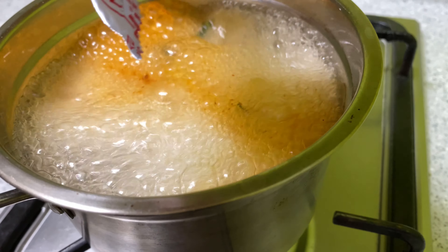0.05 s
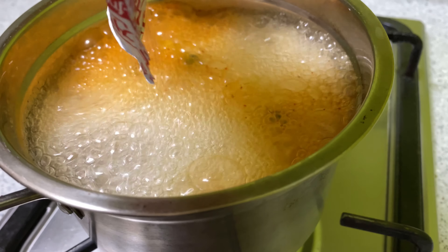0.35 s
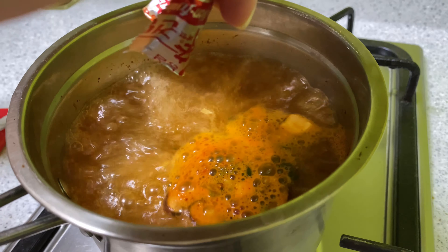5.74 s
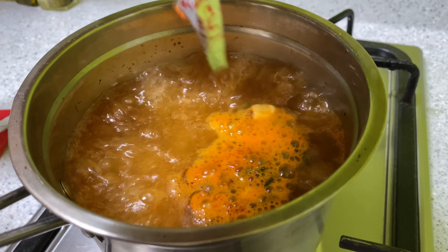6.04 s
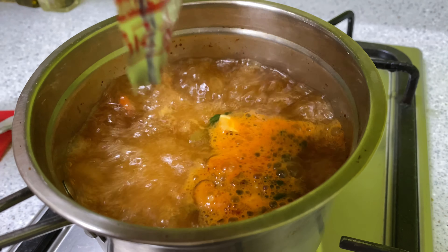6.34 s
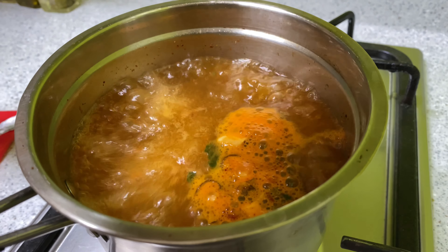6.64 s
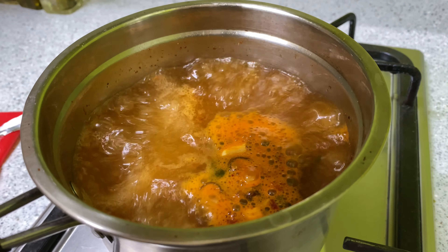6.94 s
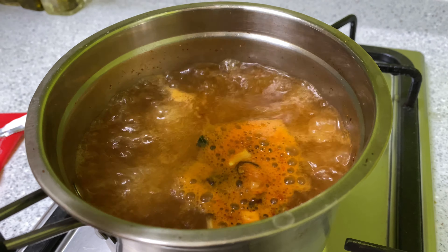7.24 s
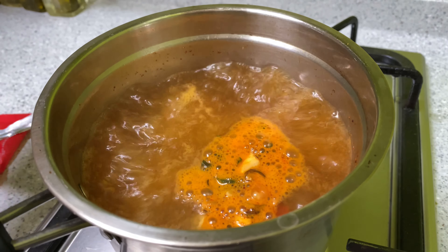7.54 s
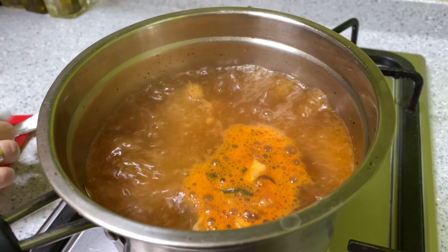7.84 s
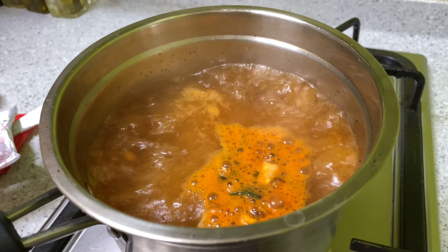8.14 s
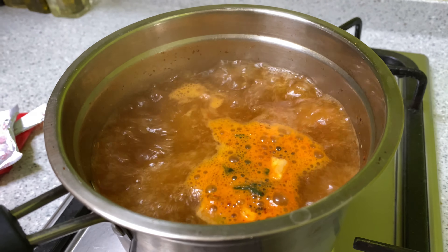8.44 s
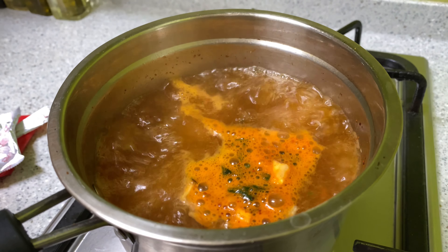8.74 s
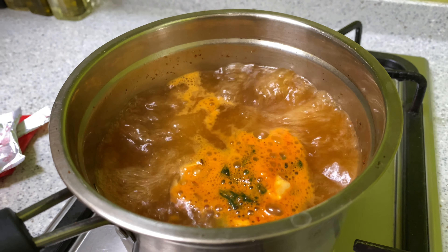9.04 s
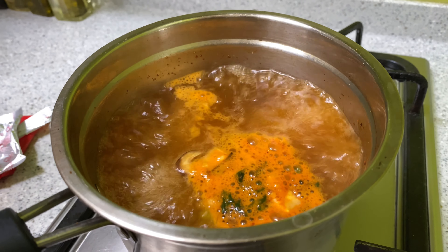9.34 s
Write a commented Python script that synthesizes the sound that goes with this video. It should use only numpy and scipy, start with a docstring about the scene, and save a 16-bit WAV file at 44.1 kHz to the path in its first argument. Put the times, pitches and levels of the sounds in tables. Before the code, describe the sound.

A steel pot of broth boils throughout in a small kitchen, a low rumble that grows a little over the first four seconds, with a light simmer and a fine hiss of foam on top. From about 0.3 seconds, fingers squeeze plastic seasoning sachets close by: an uneven, bright crinkle dotted with sharp snapping creases, the sharpest at about 1.5 seconds. Faint bumps come at 1.4 and 3.8 seconds, and the plastic gives one hollow pop at 3.7. The crinkling is busiest from 4.4 to 5.8 seconds and stops just after 6, leaving two stray ticks. The foam's hiss fades away by about 7 seconds while the rumble continues. A soft, low double bump lands at 7.5 seconds. From 8.5 seconds to the end, just past 9, the packets slide and crumple with a duller rustle, with another padded thump at 9.1.

```python
"""Seasoning sachets over a boiling pot

Plastic sachets are squeezed empty over a steel pot of broth in a small kitchen. Steam bubbles make the
pot rumble while its foam hisses and slowly sinks. Creases snap one by one over a fine crinkle, a panel
pops once, and a few soft bumps come and go. Near the end the packets are handled with a duller rustle."""
import sys
import numpy as np
from scipy import signal
from scipy.io import wavfile
from scipy.ndimage import uniform_filter1d

SR = 44100
rng = np.random.default_rng(int(sys.argv[2]) if len(sys.argv) > 2 else 0)


def dump_mix(stems):
    """Bounce the given channels to the path in sys.argv[1] as a 16-bit WAV at rate SR."""
    frames = np.atleast_2d(stems).T  # one column per channel
    limited = np.clip(frames, -1, 1)  # hard clip at full scale
    pcm = np.round(limited * 32767).astype(np.int16)
    wavfile.write(sys.argv[1], SR, pcm)


N = 413658
TIME = np.arange(N) / SR

# How strongly the broth boils: time_s, level_db
BOIL_LEVEL = [(0, -51.5), (.45, -50), (.8, -46.5), (2.2, -45.5), (3.1, -44), (3.8, -39.5), (4.1, -42),
              (5.3, -42.5), (6.15, -40), (6.6, -43), (7.05, -41.5), (8.1, -42.5), (9.38, -43.5)]
# The deep tone of the rumble: frequency_hz, gain_db
RUMBLE_TONE = [(22, -55), (33, -11), (43, -9.5), (56, 0), (62, -1), (69, 1.5), (82, -7), (100, -10),
               (150, -23.5), (200, -18.5), (300, -35), (600, -54)]
# One low note of the pot, kept going by the boil: time_s, level_db
DRONE_LEVEL = [(0, -53.5), (3.2, -48.5), (5.2, -51), (6.1, -49.5), (7.05, -46.5), (7.5, -49.5),
               (8.1, -53.5), (9.38, -49.5)]
# The foam's hiss, fading as it sinks: time_s, level_db
FOAM_LEVEL = [(0, -44), (.45, -47), (2.2, -46), (3.55, -52), (5, -51), (6.3, -54.5), (7, -65), (9.38, -94)]
# The tone of that hiss: frequency_hz, gain_db
FOAM_TONE = [(150, -20), (320, -6), (450, -3.5), (660, 0.5), (1040, 0), (1900, 1), (3830, -3), (7830, -5.5),
             (16000, -9)]
# The tone of the steady simmer: frequency_hz, gain_db
SIMMER_TONE = [(170, -17.5), (240, 0), (290, -7.5), (350, -4.5), (500, -13.5), (750, -10), (1250, -16),
               (1900, -16.5), (3100, -14.5), (3700, -21), (10500, -21), (16000, -26.5)]
# Fingers press the plastic film: start_s, length_s, level_db
FINGER_SQUEEZES = [(0.265, 0.023, -41), (0.527, 0.031, -33), (0.632, 0.052, -36.5), (0.72, 0.14, -40.5),
                   (1.085, 0.024, -36.5), (1.173, 0.13, -40.5), (1.38, 0.12, -43), (1.53, 0.22, -42),
                   (1.863, 0.11, -38), (2.145, 0.022, -39), (2.284, 0.027, -39.5), (2.374, 0.068, -34.5),
                   (2.462, 0.034, -41), (2.53, 0.079, -35.5), (2.68, .11, -35.5), (2.829, 0.025, -30),
                   (2.88, 0.057, -38), (3.04, 0.03, -40.5), (3.147, 0.19, -40), (3.376, 0.16, -40.5),
                   (3.65, .04, -44), (3.808, .08, -44.5), (4.002, 0.16, -38), (4.167, 0.071, -43.5),
                   (4.297, .11, -43.5), (4.419, 0.12, -31), (4.547, .07, -36), (4.67, 0.241, -35),
                   (5.01, 0.17, -32.5), (5.193, 0.18, -37), (5.307, 0.2, -31.5), (5.486, 0.11, -37),
                   (5.643, .13, -31.5), (5.878, 0.031, -34.5), (5.956, 0.017, -38), (6.065, 0.02, -39)]
# The tone of the crinkling film: frequency_hz, gain_db
FILM_TONE = [(200, -22.5), (480, -10), (1150, -1.5), (1950, -10.5), (2400, -2), (3000, -4), (3400, -2),
             (3950, -4), (4800, -3), (5600, -3), (7000, -3), (9600, -3), (12000, -10.5), (16000, -13.5)]
# The loudest creases that snap: start_s, pitch_hz, level_db, body_db (hollow part, relative to level_db)
CREASE_SNAPS = [(0.5338, 3900, -30, -12), (0.544, 4220, -31, -11.5), (0.588, 5600, -30.5, -14),
                (0.6027, 4800, -26, -24), (0.6752, 10100, -29.5, -17), (0.6921, 4600, -27, -7.5),
                (0.7414, 6740, -25.5, -17), (0.7715, 5800, -25, -9), (0.8418, 2630, -34, -9),
                (0.912, 5400, -27, -17), (0.9888, 9700, -26.5, -22), (1.0018, 3780, -27.5, -24),
                (1.097, 5070, -31.5, -13), (1.211, 5700, -31, -19), (1.261, 7300, -31.5, -14),
                (1.3705, 8400, -28.5, -15), (1.4096, 3940, -31, -13), (1.4494, 4300, -32.5, -15),
                (1.471, 6000, -34.5, -18.5), (1.5263, 3760, -18, -15.5), (1.5719, 3850, -23.5, -17),
                (1.5827, 2600, -26, -17), (1.5938, 3200, -29, -7.5), (1.6507, 3400, -32.5, -5),
                (1.667, 4900, -30, -23), (1.7093, 4100, -33.5, -5.5), (1.9123, 6300, -22, -13),
                (1.921, 4900, -28.0, -13), (1.9623, 4440, -27, -24), (2.4232, 7400, -29, -9),
                (2.5325, 7600, -29, -30), (2.5986, 5470, -22.5, -13.5), (2.673, 7800, -26.5, -36),
                (2.7303, 7800, -29, -7.5), (2.75, 3970, -28.0, -14), (2.8148, 3100, -30.5, -9),
                (2.835, 6000, -29, -24), (2.887, 4900, -30.5, -9), (2.924, 5870, -29, -7.5),
                (3.2582, 8600, -27.0, -31), (3.305, 6900, -30, -22), (3.4226, 3170, -26.5, -7.5),
                (3.4316, 3600, -28.5, -24), (3.6891, 8750, -25, -33), (3.762, 2690, -25, -18),
                (3.807, 7000, -31.5, -17), (3.8692, 6600, -30, -13), (4.02, 10100, -28.5, -29),
                (4.0756, 6400, -29, -15), (4.1041, 9800, -25.5, -25), (4.1382, 5500, -29.5, -14),
                (4.226, 4800, -33.5, -16), (4.3021, 5100, -28, -13.5), (4.3422, 6160, -30, -14),
                (4.3997, 5560, -27.5, -18), (4.4651, 3930, -20.5, -10.5), (4.5241, 7500, -22, -35),
                (4.536, 4430, -27, -22), (4.581, 4800, -32.5, -3.5), (4.7248, 7860, -23.5, -11.5),
                (4.7938, 7600, -24.5, -13), (4.8184, 9400, -22, -35), (4.8879, 6900, -25.0, -8.5),
                (5.0943, 6100, -24, -11.5), (5.114, 6850, -24.0, -27), (5.1401, 7000, -23, -12),
                (5.2014, 6740, -31, -17.5), (5.324, 9200, -26, -30), (5.3359, 6940, -24, -23),
                (5.4426, 6500, -23, -26), (5.662, 6100, -24.5, -18), (5.689, 8100, -28, -10),
                (5.814, 10900, -31.5, -13), (5.8822, 5600, -27.5, -22), (5.909, 4660, -29.5, -15.5),
                (5.98, 5230, -28, -14.5), (6.0742, 3450, -32.5, -16), (6.4823, 4750, -30, -12),
                (6.7132, 7400, -30, -26)]
# The body, crack and sizzle of a snap, one row each: low_hz, high_hz
SNAP_RANGES = [(450, 1600), (2200, 5480), (6000, 15000)]
# Soft bumps: start_s, knock_db, thud_db, thud_delay_s, thud_pitch_factor
SOFT_BUMPS = [(1.351, -36, -48, 0.0048, 1.4), (3.846, -45, -33.5, 0.0092, 1.16),
              (7.498, -30, -23.5, 0.019, 0.96), (7.527, -29, -32, 0.0219, 1.43),
              (9.089, -27, -26.5, 0.0055, 1.66)]
# The tone of a padded knock: frequency_hz, gain_db
KNOCK_TONE = [(90, 0.5), (200, 2), (380, -2), (560, -13.5), (800, -8.5), (1300, -15), (2000, -21),
              (3500, -28), (8000, -50)]
# The notes of a thud, before each bump's pitch factor: pitch_hz, level_db, fade_s (time to fall 60 dB)
THUD_NOTES = [(53.6, 4, 0.37), (74.3, 2, 0.14), (102, -32, 0.079), (177, -13, 0.06), (236, -11, 0.1)]
# A whole panel of the sachet pops through: start_s, gain_db
PANEL_POPS = [(3.698, -13)]
# The notes of that panel: pitch_hz, level_db, fade_s
PANEL_NOTES = [(900, -28, 0.0042), (1080, -23, .009), (1260, 1.5, 0.016), (1600, -5, 0.0079),
               (2240, -6, 0.006), (3480, -14, 0.021), (3865, -11.5, 0.021), (5100, -3, 0.0074)]
# Packets crumple beside the pot: start_s, level_db, length_s, tilt_db_per_octave (higher is brighter)
PACKET_CRUMPLES = [(8.504, -40, 0.022, 1), (8.543, -39, .012, 0), (8.597, -38, 0.0089, -4.5),
                   (8.616, -38, 0.0065, -6.5), (8.637, -34.5, .008, 1.5), (8.658, -36.5, 0.0083, -3),
                   (8.67, -29.5, 0.011, 3.5), (8.691, -41.5, 0.02, 2.5), (8.734, -39.5, .008, 1.5),
                   (8.783, -42.5, 0.0095, -1.5), (8.91, -34.5, 0.0071, -1), (8.958, -40.5, 0.0063, -3.5),
                   (9.007, -44.5, 0.014, -3), (9.068, -36, 0.035, -8), (9.192, -41, .012, -2),
                   (9.297, -38, 0.017, -2.5), (9.351, -34, 0.0081, -2.5)]
# The dull tone of a handled packet: frequency_hz, gain_db
PACKET_TONE = [(250, -9), (520, -4), (900, -5.5), (1300, -6), (2200, -4.5), (3200, -9.5), (4900, -9.5),
               (7000, -15), (15000, -23)]
# The packets slide: time_s, level_db
SLIDE_LEVEL = [(8.45, -67), (8.52, -49), (8.97, -50.5), (9.05, -42.5), (9.13, -46), (9.25, -54),
               (9.38, -53)]
# The pot rings in answer to sounds above it: pitch_hz, level_db, fade_s
POT_NOTES = [(1230, -43, 0.05), (2550, -53, 0.082), (3350, -47, 0.02), (3574, -32, 0.018),
             (5840, -42.5, 0.075)]
# How long the kitchen echoes: frequency_hz, fade_s
ROOM_FADE = [(200, 0.7), (1000, 0.15), (4000, 0.2), (9000, 0.022), (16000, 0.57)]


def amp(db):
    """Turns decibels into a number to multiply by."""
    return 10 ** (np.asarray(db) / 20)


def unit(x):
    """Scales a signal to an average strength (rms) of 1."""
    return x / np.sqrt(np.mean(x ** 2) + 1e-20)


def follow(curve):
    """The gain at every sample, from rows of time_s, level_db."""
    return amp(np.interp(TIME, *np.transpose(curve)))


def read(points, hz):
    """Looks up a table by frequency, with octaves evenly spaced."""
    table_hz, value = np.transpose(points)
    return np.interp(np.log(hz + 1), np.log(table_hz + 1), value)


def add(mix, start_s, sound):
    """Mixes a sound in at its start time."""
    part = mix[max(round(start_s * SR), 0):][:len(sound)]
    part += sound[:len(part)]


def colour(x, tone, tilt_db=0, size=2048):
    """Gives a sound a tone, tilted by tilt_db an octave around 1 kHz; sharp starts stay sharp."""
    hz = abs(np.fft.fftfreq(size, 1 / SR))
    log_gain = np.log(amp(read(tone, hz) + tilt_db * np.log2(hz / 1000 + .1)))
    taps = np.fft.ifft(np.exp(np.conj(signal.hilbert(log_gain)))).real
    return signal.oaconvolve(x, taps[:size // 2])[:len(x)]


def resonate(x, hz, width_hz):
    """Keeps the part of a sound near one pitch."""
    return signal.lfilter(*signal.iirpeak(hz, hz / width_hz, fs=SR), x)


def ring(notes, size=24000):
    """The fading notes of something struck."""
    t = np.arange(size) / SR
    return sum(amp(db) * np.sin(2 * np.pi * hz * t) * np.exp(-np.log(1000) * t / fade_s)
               for hz, db, fade_s in notes)


def drift(per_s):
    """Glides to a new random value per_s times a second."""
    return unit(np.interp(TIME * per_s, np.arange(N // 50), rng.standard_normal(N // 50)))


def clicks(per_s, spread_db):
    """Random clicks: many small, a few large."""
    size = amp(spread_db * np.minimum(rng.exponential(1, N), 3))
    return size * rng.choice([-1, 1], N) * (rng.random(N) < per_s / SR)


def boil(rumble_db=-1, drone_hz=129):
    """Steam bubbles collapsing on the bottom shake the pot and its broth."""
    shaking, drone = rng.standard_normal((2, N))
    for _ in range(2):
        drone = resonate(drone, drone_hz, width_hz=22)
    rumble = unit(colour(shaking, RUMBLE_TONE, size=32768))
    return amp(rumble_db) * follow(BOIL_LEVEL) * rumble + follow(DRONE_LEVEL) * unit(drone)


def fizz(simmer_db=-52, spit_db=-56, clump_db=6):
    """Countless foam bubbles burst as a hiss; tiny ones spit high above the steady simmer."""
    foam = unit(colour(clicks(per_s=7000, spread_db=2), FOAM_TONE))
    simmer = unit(colour(rng.standard_normal(N), SIMMER_TONE))
    # each dome of steam that breaks the surface leaves a brief patch of fizz
    clumps = amp(spit_db + clump_db * np.tanh(drift(16)))
    bursts = clicks(per_s=2600, spread_db=7.5)
    spit = unit(colour(bursts, [(1500, -29), (5000, -10), (10000, -6), (15000, -8.5)]))
    return follow(FOAM_LEVEL) * foam + amp(simmer_db) * simmer + clumps * spit


def squeezing(press_s=0.014, relax_s=0.017, hold_db=-51):
    """How hard the fingers work: each squeeze builds, holds and lets go, with a light grip between."""
    effort = amp(hold_db) * ((TIME > FINGER_SQUEEZES[0][0]) & (TIME < FINGER_SQUEEZES[-1][0]))
    for start_s, length_s, db in FINGER_SQUEEZES:
        press = np.clip((TIME - start_s) / press_s + .5, 0, 1)
        relax = np.exp(-np.maximum(TIME - start_s - length_s, 0) / relax_s)
        effort = np.maximum(effort, amp(db) * press * relax)
    return effort


def crinkle(fade_cycles=2.8, scratch_db=1, rub_db=-12, clump_db=3, level_db=-1, pitches=24):
    """Tiny patches of film buckle with brief ticks, more under a harder squeeze; the film also rubs."""
    effort = squeezing()
    tightness = effort / effort.max()
    busy = tightness ** .8 + .08
    buckles = clicks(per_s=760 * busy, spread_db=5) / np.sqrt(busy)
    which_pitch = rng.integers(0, pitches, N)
    ticks, t = np.zeros(N), np.arange(256) / SR
    for k, hz in enumerate(np.geomspace(1300, 15000, pitches)):
        note = np.exp(-t * hz / fade_cycles) * np.cos(2 * np.pi * hz * t)
        scratch = np.exp(-t / 0.0014) * rng.standard_normal(len(t))
        tick = unit(note) * np.sqrt(hz / 3000) + amp(scratch_db) * unit(scratch)
        ticks += signal.oaconvolve(buckles * (which_pitch == k), tick)[:N]
    rub = amp(rub_db) * rng.standard_normal(N)
    rustle = (unit(ticks) + rub) * amp(clump_db * drift(60))
    # film pulled tight sounds brighter than slack film
    slack = unit(colour(rustle, FILM_TONE, tilt_db=-.8))
    tight = unit(colour(rustle, FILM_TONE, tilt_db=.64))
    film = (1 - tightness) * slack + tightness * tight
    # loudness follows the fingers, whether the ticks are few and large or many and small
    strength = np.sqrt(uniform_filter1d(film ** 2, size=2600))
    return amp(level_db) * effort * film / strength


def snaps(flip_s=0.00031, flutter_s=0.0039, flutter_db=-10, note_db=9, even_hz=5800, size=700):
    """A crease flips in an instant, at the pitch of its patch of film; the film around it flutters on."""
    out, t = np.zeros(N), np.arange(size) / SR
    bands = [signal.butter(3, band, "band", fs=SR, output="sos") for band in SNAP_RANGES]
    attack = round(.004 * SR)  # a snap's level is set over its first 4 ms
    for start_s, hz, db, body_db in CREASE_SNAPS:
        flip = np.exp(-t / flip_s) * rng.standard_normal(size)
        flip += amp(note_db) * resonate(flip, hz, width_hz=hz / 3)
        flip += amp(flutter_db) * np.exp(-t / flutter_s) * rng.standard_normal(size)
        # crack and sizzle are equal at even_hz; smaller, higher patches sizzle more
        sizzle = amp(14.5 * np.log2(hz / even_hz))
        shares = amp(body_db), 1 / np.hypot(1, sizzle), sizzle / np.hypot(1, sizzle)
        for band, share in zip(bands, shares):
            part = signal.sosfilt(band, flip)
            add(out, start_s, amp(db) * share * part / np.std(part[:attack]))
    return out


def bumps(rise_s=0.0036, fall_s=0.017, size=12000):
    """A padded knock, then the low thud of what was struck."""
    out, t = np.zeros(N), np.arange(size) / SR
    swell = np.exp(-t / fall_s) - np.exp(-t / rise_s)
    for start_s, knock_db, thud_db, delay_s, factor in SOFT_BUMPS:
        knock = unit(colour(rng.standard_normal(size), KNOCK_TONE)) * swell
        thud = ring([(hz * factor, db, fade_s / factor) for hz, db, fade_s in THUD_NOTES])
        add(out, start_s, amp(knock_db) * knock)
        add(out, start_s + delay_s, -amp(thud_db) * thud)
    return colour(out, [(26, -36), (48, 0)], size=16384)  # trims the deepest bass


def panel_pop():
    """A wide panel of film turns inside out with a hollow tock; it is too small to make much bass."""
    out = np.zeros(N)
    for start_s, db in PANEL_POPS:
        add(out, start_s, amp(db) * colour(ring(PANEL_NOTES), [(150, -19), (900, -3)]))
    return out


def handling(air_hz=840, fall_hz_per_s=91, air_db=12.5, air_width_hz=135, slide_hz=760, size=8000):
    """Packets slide and crumple: clusters of dull clicks make the air inside them ring."""
    out, t = np.zeros(N), np.arange(size) / SR
    grains = unit(clicks(per_s=3000, spread_db=4))
    for start_s, db, length_s, tilt_db in PACKET_CRUMPLES:
        # the air rings lower as the handling goes on, give or take a little
        hz = air_hz - fall_hz_per_s * (start_s - PACKET_CRUMPLES[0][0])
        hz *= np.exp(.09 * rng.standard_normal())
        swell = (t / length_s) * np.exp(-3 * t / length_s)
        cluster = np.roll(grains, -round(start_s * SR))[:size] * swell
        crumple = colour(cluster, PACKET_TONE, tilt_db)
        crumple += amp(air_db) * resonate(crumple, hz, air_width_hz)
        add(out, start_s, amp(db) * crumple * np.sqrt(length_s * SR) / np.linalg.norm(crumple))
    slide = colour(grains, PACKET_TONE, tilt_db=1.5)
    slide += amp(air_db) * resonate(slide, slide_hz, air_width_hz)
    return out + follow(SLIDE_LEVEL) * (TIME > SLIDE_LEVEL[0][0]) * unit(slide)


def kitchen(x, near_db=-13.5, tail_db=-12, pot_db=-5, echoes=12):
    """The pot rings, the stove and wall send back quick echoes, and the room adds a short tail."""
    t = np.arange(SR // 2) / SR
    noise = rng.standard_normal(len(t)) * (t > .006)
    hz, time_s, spectrum = signal.stft(noise, SR, nperseg=256)
    fade = np.exp(-np.log(1000) * time_s / read(ROOM_FADE, hz)[:, None])
    tail = signal.istft(spectrum * fade, SR, nperseg=256)[1][:len(t)]
    near, delay_s = np.zeros(len(t)), rng.uniform(.003, .02, echoes)
    near[(delay_s * SR).astype(int)] = rng.choice([-1, 1], echoes) / np.sqrt(delay_s)
    near = colour(near, [(2500, -7), (15000, 2.5)])
    echo = amp(near_db) * near / np.linalg.norm(near) + amp(tail_db) * tail / np.linalg.norm(tail)
    pot = amp(pot_db) * ring(POT_NOTES, size=len(t))
    return x + signal.oaconvolve(x, echo + pot)[:N]


def scene():
    """Sachets and bumps echo in the kitchen over the boiling pot, in one channel."""
    hand_sounds = snaps() + crinkle() + panel_pop() + handling() + bumps()
    return (kitchen(hand_sounds) + boil() + fizz())[None]


def record(dry, top_hz=15950):
    """Cuts off the very highest treble."""
    low_pass = signal.firwin(401, top_hz, window=("kaiser", 8), fs=SR)
    return signal.oaconvolve(dry, low_pass[None], "same")


dry = scene()
out = record(dry)
dump_mix(out)
```